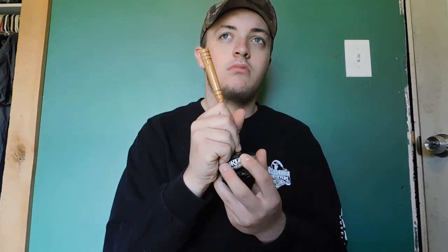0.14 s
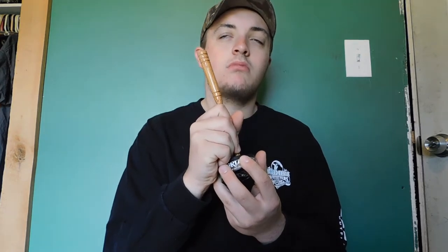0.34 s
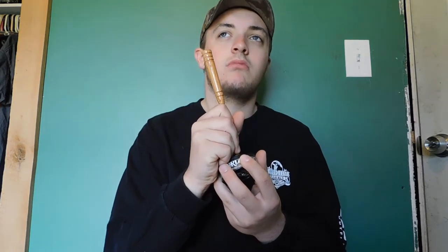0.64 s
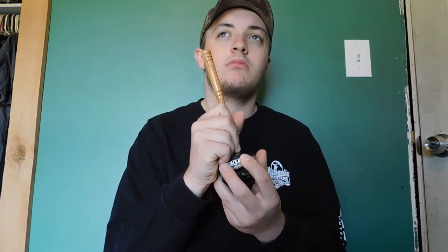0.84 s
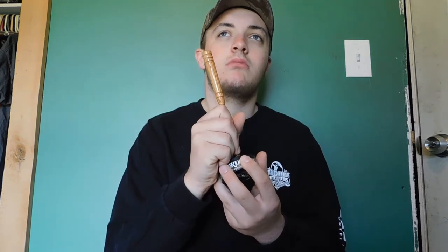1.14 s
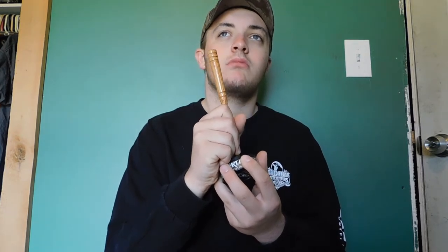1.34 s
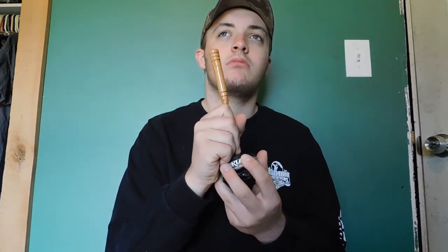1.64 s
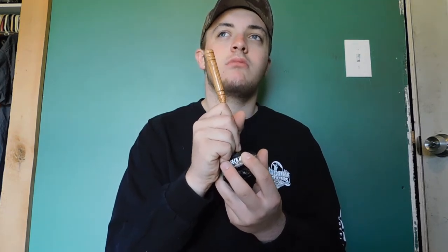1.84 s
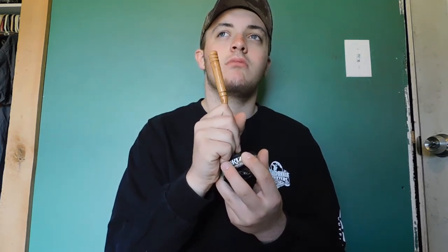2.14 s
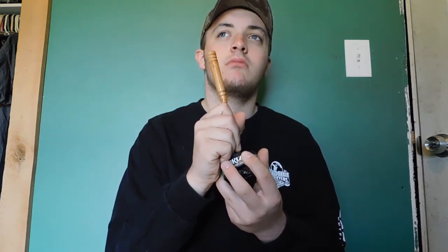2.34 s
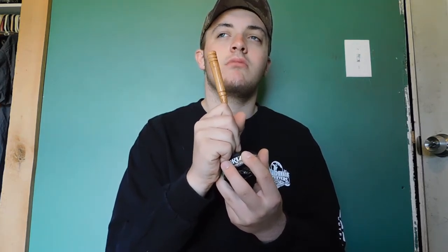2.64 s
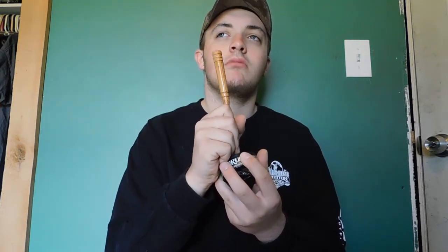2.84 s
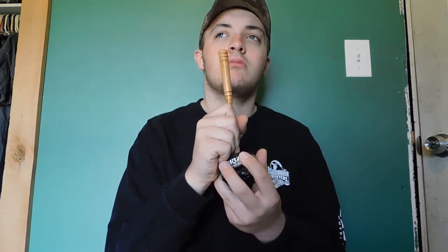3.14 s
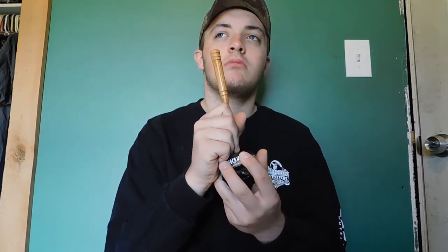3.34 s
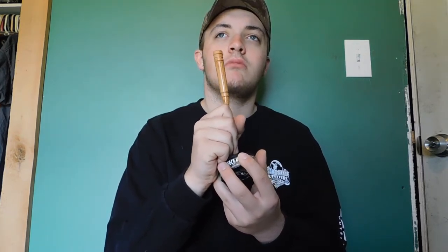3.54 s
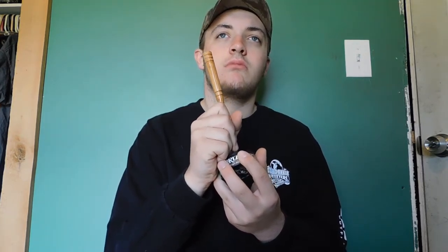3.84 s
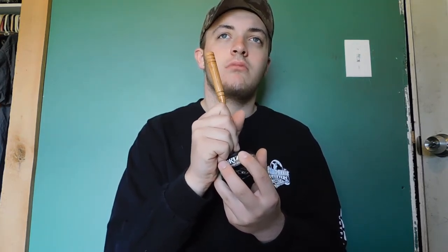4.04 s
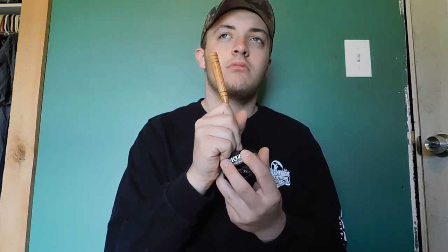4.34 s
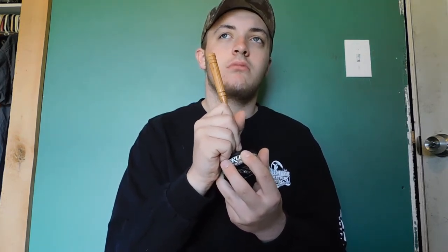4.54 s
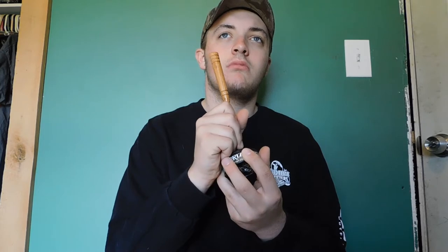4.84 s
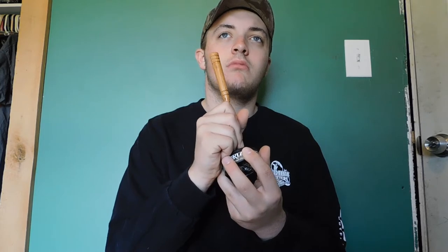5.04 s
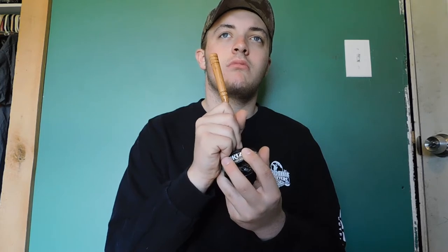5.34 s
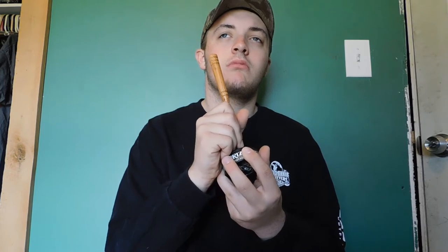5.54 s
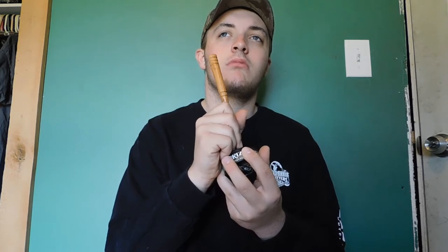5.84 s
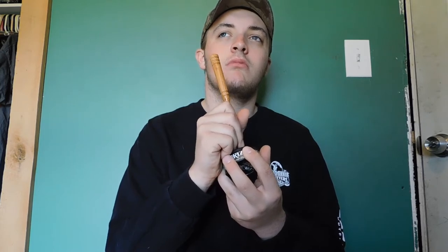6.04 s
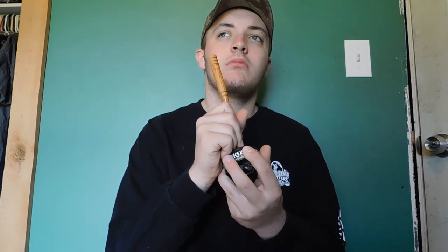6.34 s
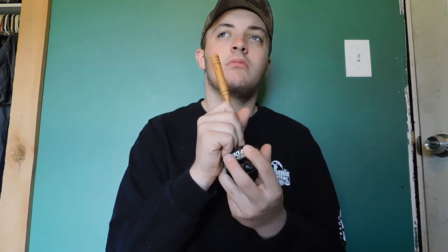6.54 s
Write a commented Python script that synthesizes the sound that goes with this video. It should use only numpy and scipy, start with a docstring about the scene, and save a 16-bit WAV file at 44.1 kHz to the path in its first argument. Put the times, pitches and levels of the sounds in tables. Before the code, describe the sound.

A wooden peg scrapes a slate friction call held close to the microphone. A few quick chirps open, then a row of loud, hollow, falling clucks comes about every third of a second. After that the sound softens into fluttering purrs in separate bursts, each starting faint and roughening. A small room answers with a short, tight echo over faint hiss and low rumble.

```python
"""Friction call in a small room

A wooden striker skips over the slate of a friction call: single clucks, then purring runs. Each slip is a
burst of stick-slip pulses, a harmonic series whose pitch sags as the tip digs in and nearly holds in light
skips. Slate and cup colour it and near surfaces echo it, with a dense tail of filtered noise. Below lie
room air (shaped noise), mains hum (sines) and a lumpy rumble (low band noise with a moving level)."""
import sys
import numpy as np
from scipy import signal
from scipy.fft import rfft, irfft, next_fast_len
from scipy.io import wavfile
from scipy.ndimage import uniform_filter1d

SR = 44100
rng = np.random.default_rng(int(sys.argv[2]) if len(sys.argv) > 2 else 0)


def dump_mix(stems):
    """Bounce the given channels to the path in sys.argv[1] as a 16-bit WAV at rate SR."""
    frames = np.atleast_2d(stems).T  # one column per channel
    limited = np.clip(frames, -1, 1)  # hard clip at full scale
    pcm = np.round(limited * 32767).astype(np.int16)
    wavfile.write(sys.argv[1], SR, pcm)


def decibels_to_gain(level_db):
    """Convert a level in decibels to a linear amplitude gain (20 dB per decade)."""
    exponent = np.asarray(level_db, float) / 20
    return 10 ** exponent


N = 295029  # samples

# Resonant radiation of slate and cup: frequency_hz, relative_level_db
BODY_RESPONSE = [(500, -54.5), (800, -24.5), (1100, -14), (1450, -0.5), (1800, -1), (2300, -1.5),
                 (2800, -4), (3400, -5), (4200, -22.5), (5000, -30.5), (5500, -23.5), (5850, -23.5),
                 (6250, -29.5), (7000, -30.5), (11000, -33.5), (15000, -37.5)]


def at_hz(points, hz):
    """Spectral interpolation: levels run straight between points on a log-frequency axis."""
    points = np.array(points)
    return np.interp(np.log(hz + 1), np.log(points[:, 0]), points[:, 1])


def rms_one(x):
    """Normalization of power: the signal is scaled to unit rms."""
    return x / np.sqrt(np.mean(x ** 2) + 1e-20)


def air():
    """Partly coherent noise: steady room air and microphone hiss, more alike on both sides in the bass."""
    # Noise density: frequency_hz, relative_level_db_per_hz
    air_spectrum = [(20, -22), (50, -14), (90, -19.5), (170, -21), (270, -18), (360, -18), (590, -14),
                    (800, -16), (1800, -16), (3200, -23), (4200, -28), (5500, -32), (9000, -36.5),
                    (16000, -35.5)]
    # Left-right coherence: frequency_hz, correlation (0 to 1)
    air_likeness = [(30, 0.68), (60, 0.77), (125, 0.72), (250, 0.38), (1000, 0.22), (8000, 0.05)]
    air_db = -59  # rms
    hz = np.fft.rfftfreq(N, 1 / SR)
    mid, side = rfft(rng.standard_normal((2, N)))
    alike = at_hz(air_likeness, hz)
    both = np.sqrt(1 + alike) * mid + np.sqrt(1 - alike) * side * [[1], [-1]]
    noise = irfft(both * decibels_to_gain(at_hz(air_spectrum, hz)), N)
    return decibels_to_gain(air_db) * rms_one(noise)


def hum():
    """Superposition of steady sines: the harmonics of the mains."""
    # Mains lines: frequency_hz, rms_level_db
    mains_lines = [(60, -75), (120, -81), (180, -83.5), (240, -82)]
    t = np.arange(N) / SR
    return sum(decibels_to_gain(db) * np.sqrt(2) * np.sin(2 * np.pi * hz * t) for hz, db in mains_lines)


def rumble():
    """Amplitude-modulated band noise: a low rumble that wanders and swells, nearly alike on both sides."""
    # Swells added to the wandering level: peak_s, peak_level_db
    swells = [(.54, -61.5), (.95, -64), (1.1, -61), (1.62, -56), (2.15, -60.5), (2.77, -54.5), (3.32, -65),
              (3.97, -59), (5.25, -58), (5.74, -78)]
    swell_rise_s, swell_fall_s = 0.042, 0.06  # exponential time constants
    base_db, wander_db, wander_step_s = -75, 5, 0.065  # between the swells
    side_share = 0.11
    band = signal.butter(1, [12, 45], "band", fs=SR, output="sos")
    twice = np.vstack([band, band])  # the same band-pass twice, for steeper edges
    noise = signal.sosfilt(twice, rng.standard_normal((2, N + SR)))
    mid, side = noise[:, SR:]  # past the filter's onset
    t = np.arange(N) / SR
    steps = rng.standard_normal(400)
    wander = np.interp(t, np.arange(len(steps)) * wander_step_s, steps)
    level = decibels_to_gain(base_db + wander_db * wander)
    for peak_s, db in swells:
        time_constant = np.where(t < peak_s, swell_rise_s, swell_fall_s)
        level = level + decibels_to_gain(db) * np.exp(-np.abs(t - peak_s) / time_constant)
    return level * rms_one(mid + side_share * side * [[1], [-1]])


def scratch(count):
    """Source and filter: broadband friction noise of wood on stone, coloured by the body."""
    # Friction noise ahead of the body: frequency_hz, relative_level_db
    friction_spectrum = [(1000, -7.5), (3500, -8.5), (6000, 4), (14000, 5.5)]
    hz = np.fft.rfftfreq(2048, 1 / SR)
    white = rng.standard_normal(2048)
    colour = decibels_to_gain(at_hz(BODY_RESPONSE, hz) + at_hz(friction_spectrum, hz))
    return irfft(rfft(white) * colour)[:count]


def slip(db, start_hz, goal_hz, rise, length):
    """Stick-slip oscillation: periodic pulses whose rate moves towards goal_hz and back as the tip lets go."""
    t = np.arange(int(length * SR)) / SR
    rise = min(rise, 0.81 * length)

    # Envelope: deep digs stop short, light ones die away
    growing = np.sin(np.pi / 2 * np.minimum(t / rise, 1)) ** 1.55
    hardness = np.clip((start_hz - goal_hz) / 320.0, 0, 1)
    fade = hardness * 0.00213 + (1 - hardness) * (length - rise)  # s
    # The first full swings overshoot, then settle
    settled = 1 - np.exp(-np.maximum(t - rise, 0) / 0.0017)
    settling = decibels_to_gain(-4.5 * hardness * settled)
    swing = growing * settling * np.clip((length - t) / fade, 0, 1) ** 0.99

    # Pulse rate, with a small random jitter
    digging = 1 - np.exp(-(t / (0.811 * rise + 0.000905)) ** 3.36)
    letting_go = 1 - 0.867 * np.clip((t / length - 0.5) / 0.5, 0, 1) ** 1.765
    white = rng.standard_normal(2048)
    wobble = uniform_filter1d(white, size=64)[:len(t)] * np.sqrt(64)  # about unit rms
    hz = start_hz - (start_hz - goal_hz) * digging * letting_go
    hz = hz * (1 + 0.0054 * wobble)
    phase = 2 * np.pi * np.cumsum(hz) / SR

    # Harmonics: soft bursts and small swings are rounder
    orders = np.arange(1, 14)[:, None]
    tilt_db = 0.23 * (db + 7.5) - 7.9 * (1 - growing)  # per octave above the fundamental
    # Each overtone is as loud as the body lets it out
    overtones = decibels_to_gain(at_hz(BODY_RESPONSE, orders * hz) + tilt_db * np.log2(orders))
    # Higher overtones lag, which blunts each pulse
    lag = 0.246 * (orders - 1) ** 2  # rad
    pulses = (overtones * np.cos(orders * phase - lag)).sum(axis=0)

    # Hard slips scratch more, and more as they go on
    grit_level = decibels_to_gain(-11 + 0.71 * (db + 34.0))
    grit = scratch(len(t)) * (t / length) ** 0.54 * grit_level
    return decibels_to_gain(db) * swing * (pulses + grit) / np.sqrt(np.mean(pulses ** 2))


def striker():
    """Frictional load sets the pitch: hard slips dive from a raised start, light skips nearly hold."""
    # Hard slips, the tip digs in: start_s, relative_level_db, pitch_floor_hz, length_s
    hard_slips = [(.105, -22.5, 1066, 0.02), (0.127, -22.5, 945, 0.022), (0.567, -17.5, 884, 0.024),
                  (0.595, -24, 955, 0.052), (.996, -12.5, 869, 0.02), (1.318, -11.5, 845, 0.017),
                  (1.646, -11.5, 874, 0.018), (2.051, -10, 853.3, 0.022), (2.42, -11, 812, .021),
                  (2.795, -11, 850.6, .018), (3.173, -12.5, 895.6, 0.021), (3.505, -13, 934.3, 0.023),
                  (4.301, -20, 952, 0.016), (4.337, -20.5, 910, 0.016), (4.372, -22, 875, 0.014),
                  (4.431, -28.5, 1007, 0.017), (5.021, -24, 945, 0.02), (5.094, -24, 961, 0.021),
                  (5.141, -22, 917, 0.016), (5.182, -23.5, 860, 0.017), (5.216, -23, 862, 0.018),
                  (5.563, -25, 994, 0.014), (5.625, -20.5, 806, 0.018), (5.658, -24.5, 838, 0.021),
                  (5.705, -21, 801, 0.018), (5.748, -23.5, 796, 0.018), (6.108, -19.5, 806, 0.02),
                  (6.143, -20.5, 840, .013), (6.186, -19, 814, 0.021), (6.235, -22.5, 833, 0.018),
                  (6.275, -29.5, 803, 0.018), (6.642, -23, 947, .025)]
    # Light skips, the tip barely grips: start_s, relative_level_db, free_pitch_hz, length_limit_s
    # (lengths are capped at 0.045 s below)
    light_skips = [(.159, -23.5, 1171, 0.01), (0.181, -38, 1155, 0.015), (0.208, -26, 1192, 0.019),
                   (0.237, -28.5, 1137, 0.01), (0.588, -19, 1117, .013), (1.028, -23, 954, 0.0093),
                   (2.464, -15.5, 1143, 0.0088), (2.821, -12.5, 1146, 0.0076), (3.541, -25.5, 975, 0.01),
                   (4.042, -40.5, 1106, 0.02), (4.059, -38, 1111, 0.024), (4.102, -43.5, 1143, 0.024),
                   (4.142, -32.5, 1155, .018), (4.162, -36.5, 1168, 0.039), (4.199, -42, 1147, 0.026),
                   (4.234, -37.5, 1153, 0.024), (4.269, -25.5, 1180, .019), (4.768, -33.5, 1179, 0.018),
                   (4.797, -29.5, 1147, .018), (4.829, -32, 1188, 0.017), (4.876, -31, 1171, 0.014),
                   (4.903, -29, 1149, 0.02), (4.94, -28, 1172, 0.016), (4.991, -28.5, 1102, 0.024),
                   (5.516, -42.5, 1020, 0.11), (5.547, -29, 1081, 0.023), (6.072, -25, 1108, 0.027),
                   (6.575, -28, 1093, .013)]
    # Pushes above the knee start higher; weaker pushes build more slowly
    dig_start_hz, dig_knee_db, dig_hz_per_db = 1155, -19.5, 14
    dig_rise_s, dig_rise_s_per_db = 0.006, 0.0001  # rise at the knee, and its growth below
    # A skip's pitch climbs from 3.1% towards 1.2% under its free value
    skip_flat_start, skip_flat_top = 0.031, 0.012
    skip_rise_share, skip_rise_most_s = 0.47, 0.012  # share of the listed length, and its cap

    bursts = []
    for start_s, db, floor_hz, length in hard_slips:
        start_hz = dig_start_hz + dig_hz_per_db * max(db - dig_knee_db, 0)
        rise = dig_rise_s + dig_rise_s_per_db * (dig_knee_db - db)
        bursts.append((start_s, db, start_hz, floor_hz, rise, length))
    for start_s, db, free_hz, length in light_skips:
        start_hz = free_hz * (1 - skip_flat_start)
        top_hz = free_hz * (1 - skip_flat_top)
        rise = min(skip_rise_share * length, skip_rise_most_s)
        bursts.append((start_s, db, start_hz, top_hz, rise, length))

    out = np.zeros(N + SR)
    for start_s, db, start_hz, goal_hz, rise, length in bursts:
        burst = slip(db, start_hz, goal_hz, rise, min(length, 0.045))
        first = int(start_s * SR)
        out[first:first + len(burst)] += burst
    return out[:N]


def room(x):
    """Convolution with a room response: direct sound, early reflections and an exponentially dying tail."""
    # Dense tail by octave band: centre_hz, t60_s, relative_level_db, left_right_correlation (0 to 1)
    tail_bands = [(705, 0.19, -23, 0.76), (1277, 0.19, -25.5, 0.61), (2796, 0.19, -32, 0.052),
                  (5250, 0.22, -33, 0.029), (11530, 0.19, -31, 0.075)]
    # Reflections from near walls and the player's body: delay_s, left_gain, right_gain
    reflections = [(.00424, .15, .08), (.00857, -.18, -.22), (.0093, .15, .13), (.01015, .08, -.15),
                   (.01211, -.3, -.3), (.01432, -.23, -.33), (.017, -.2, -.12), (.01977, .27, .12),
                   (.0216, -.13, .15), (.03104, -.18, -.12), (.0368, .1, -.15), (.03857, -.18, -.08)]
    # Stereo balance: frequency_hz, left_minus_right_db
    balance = [(700, 4), (1300, 4), (2400, 0.5), (4400, -2.2), (12000, 0)]
    t = np.arange(SR // 2) / SR
    response = np.zeros((2, len(t)))
    for hz, t60, db, alike in tail_bands:
        octave = signal.butter(2, [hz / np.sqrt(2), hz * np.sqrt(2)], "band", fs=SR, output="sos")
        noise = signal.sosfilt(octave, rng.standard_normal(response.shape))
        mid, side = noise * decibels_to_gain(db - 60 * t / t60)
        response += np.sqrt(1 + alike) * mid + np.sqrt(1 - alike) * side * [[1], [-1]]
    response *= 1 - np.exp(-(t / 0.012) ** 2)  # the tail takes time to build
    response[:, 0] += 1  # direct sound
    for delay, left, right in reflections:
        response[:, round(delay * SR)] += [left, right]
    response[0] = np.roll(response[0], 1)  # the left port is one sample farther
    size = next_fast_len(N + len(t))
    balance_db = at_hz(balance, np.fft.rfftfreq(size, 1 / SR))
    sides = decibels_to_gain(balance_db * [[0.5], [-0.5]])
    return irfft(rfft(x, size) * rfft(response, size) * sides, size)[:, :N]


def scene():
    """Linear superposition: the call in its room over a background slightly louder on the left."""
    call = room(decibels_to_gain(-2.0) * striker())
    background = air() + hum() + rumble()
    return call + background * decibels_to_gain([[0.4], [-0.4]])


def band_limit(x):
    """A steep low-pass at the top of the band."""
    return signal.sosfilt(signal.butter(12, 15950, fs=SR, output="sos"), x)


def record(dry):
    """Unity transfer: the mix passes with no added gain or filter ahead of the last stage."""
    return band_limit(dry)


dry = scene()
out = record(dry)
dump_mix(out)
```